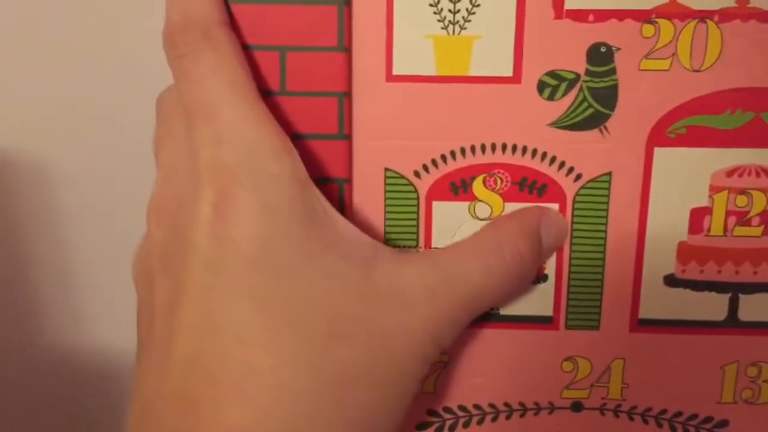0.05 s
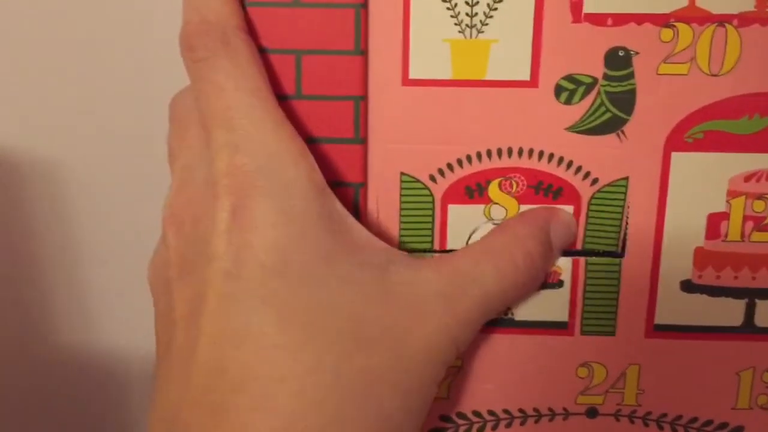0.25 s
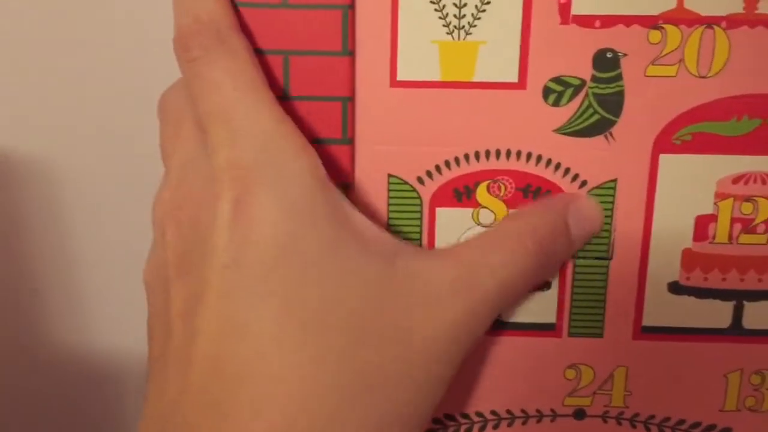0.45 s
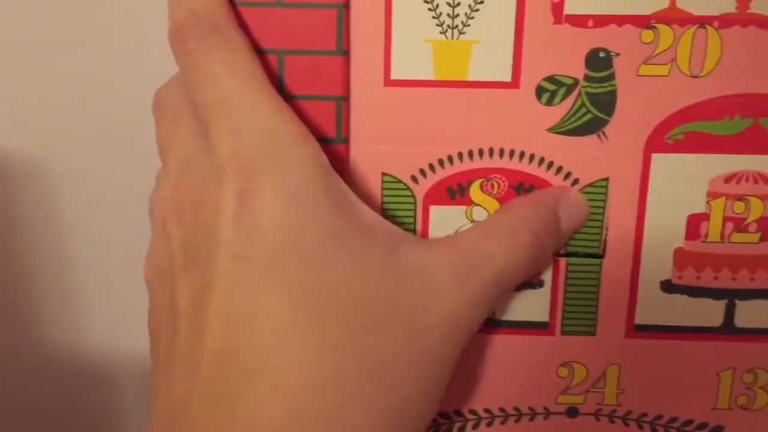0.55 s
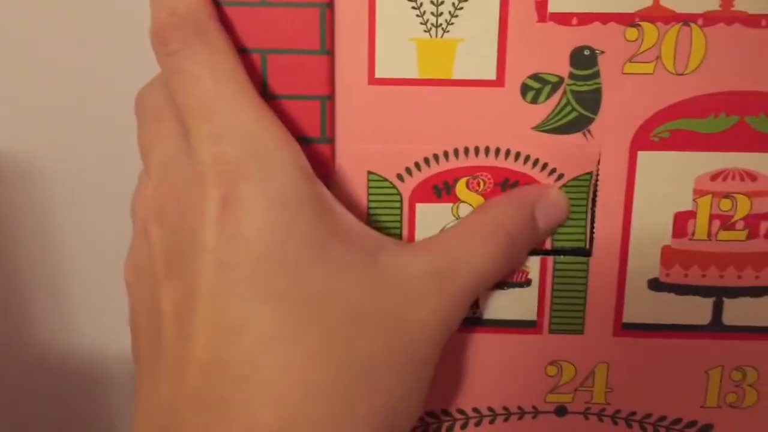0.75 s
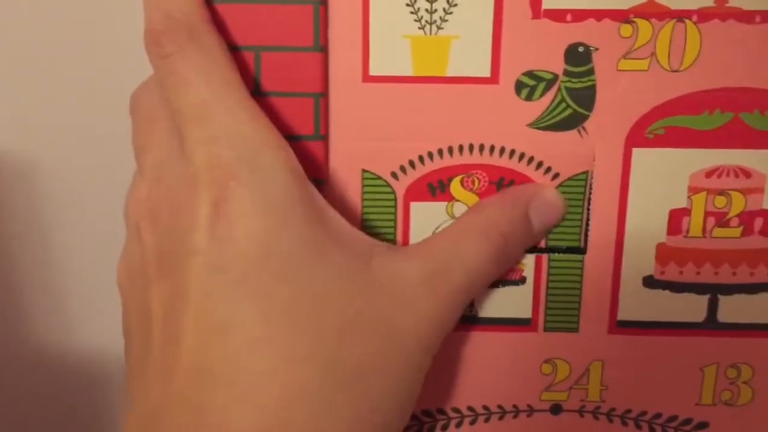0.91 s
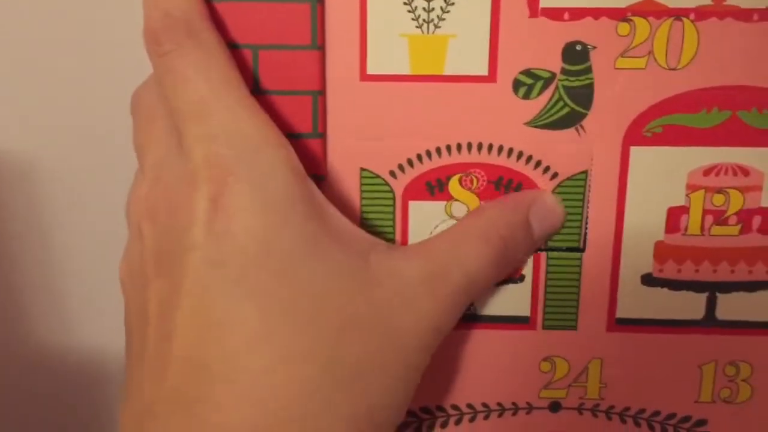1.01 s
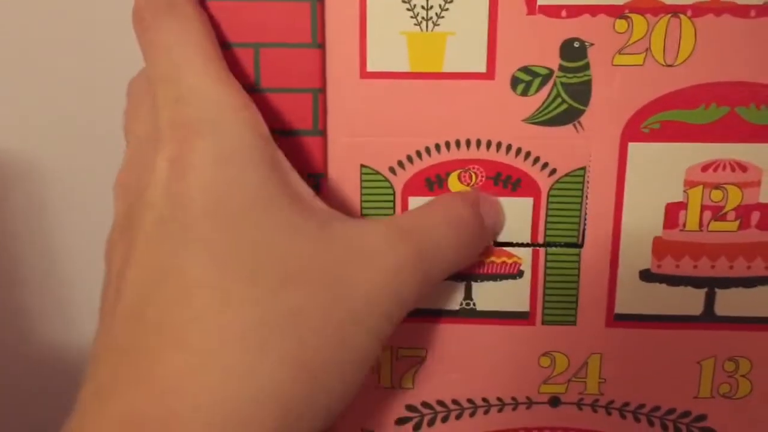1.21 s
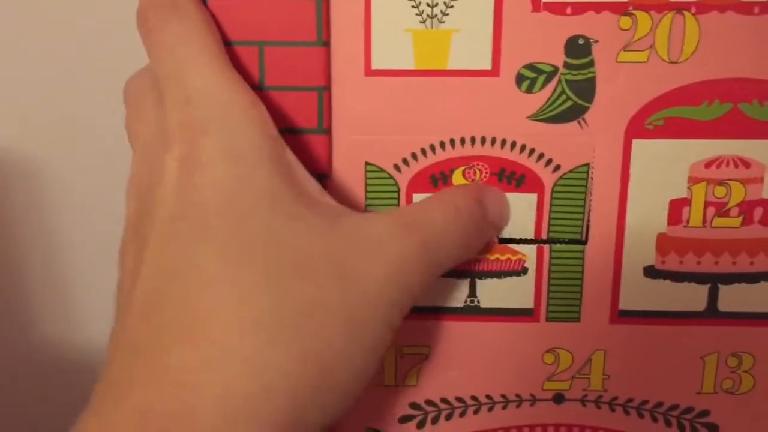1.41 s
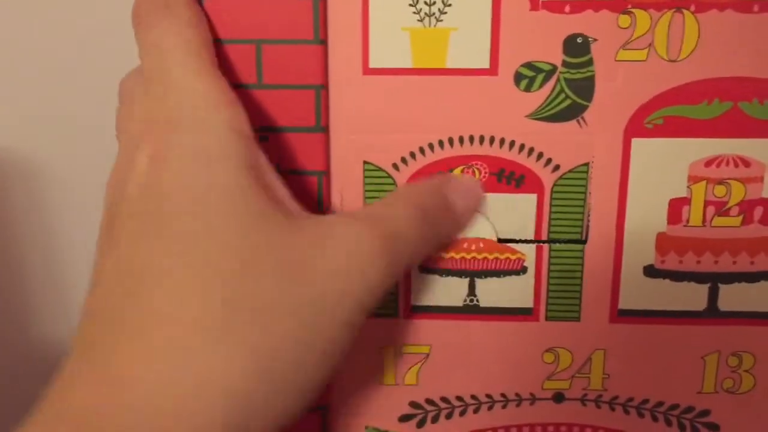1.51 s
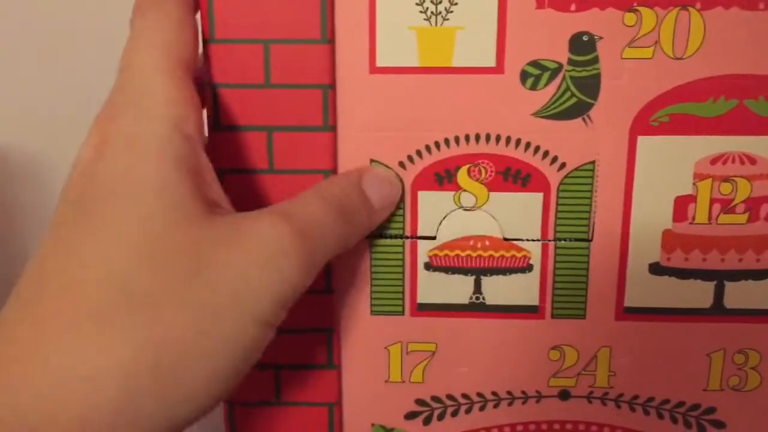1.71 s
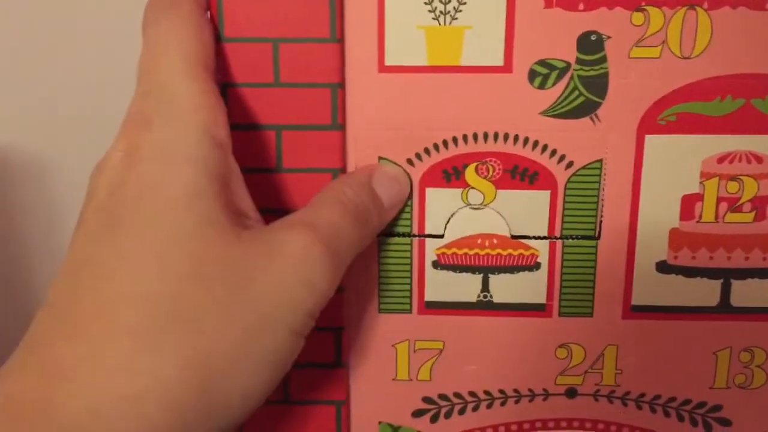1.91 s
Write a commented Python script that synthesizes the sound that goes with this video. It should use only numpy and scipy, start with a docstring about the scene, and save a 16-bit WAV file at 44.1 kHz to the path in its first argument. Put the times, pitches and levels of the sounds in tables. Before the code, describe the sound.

A perforated cardboard calendar door breaks under a thumb with two loud snaps and tiny ticks of tearing fibres. The thumb then slides faintly over the card twice and softly bumps the hollow box, close by in a small room.

```python
"""Opening a cardboard calendar door

Close by in a small room, a thumb presses in a perforated door. Two paper bridges snap loudly and
ring the sheet; single fibres tick before and after them. Then the thumb slides twice over the
printed card with a hiss and a judder, bumps the hollow box and lifts off."""
import sys
import numpy as np
from scipy import signal
from scipy.fft import rfft, irfft
from scipy.io import wavfile
from scipy.ndimage import uniform_filter1d

SR = 44100
rng = np.random.default_rng(int(sys.argv[2]) if len(sys.argv) > 2 else 0)


def dump_mix(stems):
    """Bounce the given channels to the path in sys.argv[1] as a 16-bit WAV at rate SR."""
    frames = np.atleast_2d(stems).T  # one column per channel
    limited = np.clip(frames, -1, 1)  # hard clip at full scale
    pcm = np.round(limited * 32767).astype(np.int16)
    wavfile.write(sys.argv[1], SR, pcm)


N = 85995
HIT_SIZE = 8192  # samples in the spectrum of one hit

# Tone of the room's still air. Each row: frequency in Hz, spectral level in dB.
AIR_TONE = [(25, -15), (65, -1.5), (110, -9.5), (280, -14.5), (600, -21.5), (1500, -26), (5000, -28.5),
            (15000, -41)]
# The room's echo. Each row: band centre in Hz, time to fall 60 dB in seconds, level in dB.
ECHO_BANDS = [(120, 0.35, -15.5), (302, .25, -16), (815, 0.24, -23), (1800, .19, -22), (3980, .18, -21),
              (8000, 0.14, -21.5), (14000, .16, -25.5)]
# Bending modes of the sheet. Each row: pitch in Hz, width in Hz, gain in dB.
SHEET_MODES = [(448, 100, -11.5), (700, 80, -20), (813, 510, 0), (1073, 130, 4), (1483, 150, -6.5),
               (1662, 160, -5.5), (1810, 310, -2), (2368, 390, 3), (3340, 360, -4.5), (4200, 210, -12.5),
               (5264, 330, 0.5), (6150, 560, -17.5)]
# Modes of the hollow box. Each row: pitch in Hz, width in Hz, gain in dB.
BOX_MODES = [(140.3, 18, -10), (197, 62, -1), (249, 51, 2), (292.8, 16, 0.5)]
# Fader for the hand's rumble on the box. Each row: time in seconds, level in dB.
RUMBLE_FADER = [(0, -56.5), (0.1, -88), (0.4, -75), (0.65, -62), (0.9, -74), (1.2, -63.5), (1.32, -74),
                (1.39, -42.5), (1.47, -72), (1.7, -69), (1.95, -64)]
# Tone of skin sliding on print. Each row: frequency in Hz, spectral level in dB.
HISS_TONE = [(200, -26.5), (1000, -14), (2500, 0.5), (4000, -1), (6000, 3), (8000, -1.5), (10000, -0.5),
             (13000, -5.5), (15500, 0.5)]
# Fader for that hiss. Each row: time in seconds, level in dB.
HISS_FADER = [(0.21, -88), (0.38, -62.5), (0.44, -67), (0.465, -43), (0.48, -50.5), (0.495, -64.5),
              (0.56, -68.5), (0.66, -59.5), (0.93, -69), (1.05, -63), (1.11, -55), (1.185, -50.5),
              (1.25, -56.5), (1.30, -72), (1.53, -73.5), (1.58, -49), (1.64, -54.5), (1.70, -52),
              (1.75, -57.5), (1.81, -75)]
# Fader for the judder in the sheet. Each row: time in seconds, level in dB.
JUDDER_FADER = [(0.0, -65.5), (0.06, -79.5), (0.205, -83), (0.243, -42), (0.31, -50), (0.39, -66.5),
                (0.444, -67), (0.458, -42.5), (0.478, -44), (0.495, -64), (0.55, -74.5), (0.64, -57),
                (0.73, -58), (0.87, -83.5), (1.04, -68), (1.065, -56.5), (1.13, -69), (1.20, -50),
                (1.27, -54), (1.31, -78.5), (1.40, -50.5), (1.48, -82), (1.525, -80.5), (1.545, -56),
                (1.61, -52), (1.65, -73), (1.79, -62), (1.87, -77)]
# Thumb and flap bumping the box, hardest just after a snap.
# Each row: start in seconds, level in dB, centre in Hz.
BOX_BUMPS = [(0.2496, 3.5, 1400), (0.2509, -9.5, 306), (0.278, -23.5, 1100), (0.313, -36, 200),
             (0.343, -41, 250), (0.362, -43.5, 217), (0.452, -37.5, 880), (0.473, -39, 249),
             (0.4983, -37, 680), (0.4994, -32.5, 190), (0.509, -47.5, 195), (0.598, -37.5, 1143),
             (0.612, -46.5, 250), (0.633, -42.5, 185), (0.7715, -22.5, 1210), (0.8000, -2, 1080),
             (0.921, -53, 1003), (0.935, -52, 1118), (0.990, -45.5, 201), (0.993, -48, 1000),
             (1.0622, -36.5, 1540), (1.0645, -37, 895), (1.367, -42.5, 200), (1.385, -37, 224.4),
             (1.401, -45.5, 246), (1.414, -43, 170.2), (1.442, -52, 198), (1.683, -51, 200),
             (1.8159, -36, 1033), (1.8206, -35, 720), (1.853, -46, 130)]
# Single fibres parting. Each row: start in seconds, level in dB, brightest frequency in Hz,
# sheet ring relative to the click in dB, upper edge in Hz.
FIBRE_TICKS = [(0.0288, -50, 6500, -7.5, 8550), (0.3802, -37, 7400, -37, 14700),
               (0.4023, -39.5, 6500, 1, 14800), (0.413, -36.5, 3130, -17, 14700),
               (0.6079, -30.5, 6300, -13.5, 14300), (0.6100, -29.5, 7000, -9.5, 15000),
               (0.6364, -41.5, 8060, 4.5, 15000), (0.6839, -44, 5500, -4.5, 13160),
               (0.6941, -41.5, 5370, -7.5, 13000), (0.7135, -29, 7000, -11, 15000),
               (0.7172, -40, 6240, -12.5, 14000), (0.7515, -50, 6000, -3, 13000),
               (0.8027, -27.5, 12000, -23, 15000), (0.8193, -35.5, 12000, -8, 14700),
               (0.8223, -37.5, 12000, -13.5, 15200), (0.8380, -37, 11800, -13, 15100),
               (0.8516, -28, 7200, -8.5, 15000), (0.9554, -43.5, 5730, -14, 9120),
               (0.9615, -45, 9170, -10, 13100), (1.0073, -32.5, 10500, -8.5, 11560),
               (1.0375, -49, 6100, -15, 11600), (1.0795, -42.5, 6940, -20, 12050),
               (1.0899, -26.5, 8700, -10, 10500), (1.1040, -39.5, 5460, -2.5, 9200),
               (1.3424, -38.5, 10000, -3.5, 11570), (1.4137, -53, 6900, -1, 10000),
               (1.4203, -48.5, 7000, -17, 10000), (1.4275, -48, 8000, 4, 9500)]
# Tone of the crack of breaking paper. Each row: frequency in Hz, spectral level in dB.
CRACK_TONE = [(30, -26.5), (120, -20.5), (500, -3), (1200, -16), (3000, -8.5), (5500, -11.5), (7500, -26),
              (12000, -5.5), (15500, -28.5)]
# Paper bridges breaking. Each row: start in seconds, level in dB, ring of the torn spot in Hz,
# its boost in dB, treble shelf in dB, box thump in dB, lag of the bass in milliseconds.
BRIDGE_SNAPS = [(0.2251, -44.5, 1503, 3, -3.5, 6.5, 0.57), (0.2458, -16, 4000, 2, 9.5, -3.5, 1.2),
                (0.2469, -6, 1950, 8.5, -6, 2.5, 0.78), (0.2484, -0.5, 5270, 9.5, -2, 0.5, 1.8),
                (0.2572, -17, 1674, 2, 0.5, 14, 0.99), (0.2585, -10, 1584, 11, -9.5, 11.5, 1.87),
                (0.262, -16.5, 2290, 10, 1, 2.5, 0.41), (0.2732, -30.5, 3120, 2.5, -11.5, 2, 0.63),
                (0.2858, -25.5, 2460, 2, -5, -4, 1.43), (0.2946, -19, 1560, 7.5, -8.5, -3, 0.71),
                (0.5716, -36.5, 1174, 12, -9.5, -24, 1.15), (0.7551, -39, 2400, 15, -1.5, -6.5, 2),
                (0.7584, -33.5, 4500, 10.5, 6, -5, 1.5), (0.7692, -15.5, 2900, 9, 5, -9.5, 0.56),
                (0.7797, -31.5, 4500, 6.5, -10.5, 4.5, 2), (0.7976, -6.5, 5100, 12, -4.5, -10, 1.12),
                (0.7973, -2, 2560, 16, -8, 4.5, 1.186), (1.4270, -40, 799, 32, -28, -8, 2),
                (1.5384, -42, 915, 11, -6, -6.5, 2.37), (1.5891, -48, 5420, 5, 6, -9, 2.32),
                (1.6914, -44, 2110, 16, -1.5, -4.5, 1.78), (1.9475, -38.5, 5420, 7.5, -4, -1.5, 1.14)]


def undb(db):
    """Decibels to gain."""
    return 10 ** (np.asarray(db) / 20)


def freqs(size):
    """Bin frequencies of a spectrum in Hz, floored at 1."""
    return np.maximum(np.arange(size // 2 + 1) * SR / size, 1)


def unit(x):
    """Scale to rms 1."""
    return x / np.sqrt(np.mean(x ** 2))


def fader(points):
    """Gain over time from (s, dB) points."""
    return undb(np.interp(np.arange(N) / SR, *np.array(points).T))


def colour(points, size):
    """Minimum-phase EQ curve through (Hz, dB) points."""
    hz, db = np.array(points).T
    gain = undb(np.interp(np.log(freqs(size)), np.log(hz), db))
    cepstrum = irfft(np.log(gain), size)
    cepstrum[1:size // 2] *= 2
    cepstrum[size // 2 + 1:] = 0
    return np.exp(rfft(cepstrum))


def resonance(f, hz, width):
    """Band-pass response, gain 1 at the centre."""
    return 1 / (1 + 1j * (f * f - hz * hz) / (f * width))


def ring(f, modes):
    """Response of a set of modes."""
    return sum(undb(db) * resonance(f, hz, width) for hz, width, db in modes)


def soften(f, hz):
    """Steep low-pass response."""
    return 1 / (1 + 1j * f / hz - (f / hz) ** 2) ** 2


def noise_bed(tone):
    """Steady noise through an EQ curve, at rms 1."""
    return unit(irfft(rfft(rng.standard_normal(N)) * tone, N))


def spray(decay_s):
    """Spectrum of a dying spray of tiny cracks, energy 1."""
    cracks = rng.standard_normal(HIT_SIZE) * np.exp(-np.arange(HIT_SIZE) / SR / decay_s)
    return rfft(cracks / np.linalg.norm(cracks))


def add_hit(out, start_s, spectrum, db):
    """Mix in a hit whose energy equals one millisecond at the given level."""
    hit = irfft(spectrum)[:HIT_SIZE // 2]
    hit = hit / np.linalg.norm(hit) * np.sqrt(SR / 1000) * undb(db)
    i = int(np.clip(start_s * SR, 0, N - 1))
    out[i:i + len(hit)] += hit[:N - i]


def room_air(level_db=-68):
    """Still air lays a faint, dark bed under everything."""
    return noise_bed(colour(AIR_TONE, N)) * undb(level_db)


def small_room(x, build_s=0.0062, early_s=0.005, early_db=-10, early_top_hz=6150):
    """Adds quick, dull reflections from hand and wall, then the short echo of a small room."""
    t, f = np.arange(N) / SR, freqs(N)
    noise = rfft(rng.standard_normal(N))
    log_centres = np.log(np.array(ECHO_BANDS)[:, 0])
    onset = 1 - np.exp(-(t / build_s) ** 2)
    echo = 0
    for pick, (_, t60, db) in zip(np.eye(len(ECHO_BANDS)), ECHO_BANDS):
        band = irfft(noise * np.interp(np.log(f), log_centres, pick), N)
        fade = onset * np.exp(-np.log(1000) * t / t60)
        echo = echo + undb(db) * band * fade / np.linalg.norm(fade)
    early = rng.standard_normal(N) * t * np.exp(-2 * t / early_s)
    early = irfft(rfft(early / np.linalg.norm(early)) / (1 + 1j * f / early_top_hz), N)
    return x + signal.fftconvolve(x, echo + undb(early_db) * early)[:N]


def hand_rumble():
    """The hand holding the box makes a dull rumble."""
    return noise_bed(resonance(freqs(N), hz=131, width=200) ** 2) * fader(RUMBLE_FADER)


def skin_hiss(flicker_db=0.88):
    """Skin sliding on the print gives a bright hiss with a slight flicker."""
    flicker = unit(uniform_filter1d(rng.standard_normal(N), size=300))
    return noise_bed(colour(HISS_TONE, N)) * undb(flicker_db * flicker) * fader(HISS_FADER)


def sheet_judder(catches_per_s=2700, spread_db=3.5):
    """Skin and torn edges catch and let go, ringing the midrange of the sheet."""
    f = freqs(N)
    catches = (rng.random(N) < catches_per_s / SR) * rng.choice([-1, 1], N)
    catches = catches * undb(spread_db * rng.standard_normal(N))
    ringing = rfft(catches) * ring(f, SHEET_MODES) * resonance(f, hz=1100, width=760)
    return unit(irfft(ringing, N)) * fader(JUDDER_FADER)


def box_bumps(q=0.9, box_db=-6.5, push_db=3.5, top_ratio=1.5):
    """Blunt contacts of thumb and flap reach only the lower modes."""
    out, f = np.zeros(N), freqs(HIT_SIZE)
    push = undb(push_db) * colour(CRACK_TONE, HIT_SIZE)
    body = ring(f, SHEET_MODES) + undb(box_db) * ring(f, BOX_MODES) + push
    for start_s, db, hz in BOX_BUMPS:
        blunt = resonance(f, hz, hz / q) ** 2 / (1 + 1j * f / (top_ratio * hz))
        add_hit(out, start_s, body * blunt, db)
    return out


def fibre_ticks(q=0.43, low_cut_hz=1780, broadband_db=1, spray_db=6.5):
    """A fibre parts: a bright click with a brief spray, and a ring of the sheet."""
    out, f = np.zeros(N), freqs(HIT_SIZE)
    sheet = ring(f, SHEET_MODES)
    low_cut = (1j * f / (low_cut_hz + 1j * f)) ** 2
    for start_s, db, hz, sheet_db, top_hz in FIBRE_TICKS:
        tone = (undb(broadband_db) + resonance(f, hz, hz / q)) * low_cut * soften(f, top_hz)
        click = 1 + undb(spray_db) * spray(decay_s=0.0015)
        add_hit(out, start_s, click * tone, db)
        add_hit(out, start_s, sheet, db + sheet_db)
    return out


def bridge_snaps(spot_q=3.7, shelf_hz=4500, lag_hz=1830, splinter_db=-3):
    """A paper bridge breaks with a splintering crack that rings sheet and box."""
    out, f = np.zeros(N), freqs(HIT_SIZE)
    sheet, box, crack = ring(f, SHEET_MODES), ring(f, BOX_MODES), colour(CRACK_TONE, HIT_SIZE)
    treble = f ** 2 / (f ** 2 + shelf_hz ** 2)
    # The crack returns once, inverted, from the door's edge.
    return_db, round_trip_s = -3.5, 1 / 860
    edge_comb = 1 - undb(return_db) * np.exp(-2j * np.pi * f * round_trip_s)
    for start_s, db, spot_hz, spot_db, treble_db, box_db, lag_ms in BRIDGE_SNAPS:
        splinters = undb(splinter_db) * treble * spray(decay_s=0.0041)
        body = sheet + undb(box_db) * box + crack * (edge_comb + splinters)
        torn_spot = 1 + (undb(spot_db) - 1) * resonance(f, spot_hz, spot_hz / spot_q)
        # Bending waves bring the treble first; the range below lag_hz trails behind.
        chirp = np.exp(-2j * np.pi * lag_ms / 1000 * lag_hz * np.arctan(f / lag_hz))
        add_hit(out, start_s, body * torn_spot * undb(treble_db * treble) * chirp, db)
    return out


def scene():
    """The calendar in a quiet room, in mono."""
    air = room_air()
    hits = bridge_snaps() + fibre_ticks() + box_bumps()
    handling = skin_hiss() + sheet_judder() + hand_rumble()
    return (small_room(hits + handling) + air)[None]


def record(dry, top_hz=15400):
    """The two loud snaps overload the microphone into a soft clip; the top is cut."""
    clipped = dry / (1 + dry ** 6) ** (1 / 6)
    high_cut = signal.ellip(10, 0.2, 90, top_hz, fs=SR, output="sos")
    return signal.sosfilt(high_cut, clipped)


dry = scene()
out = record(dry)
dump_mix(out)
```